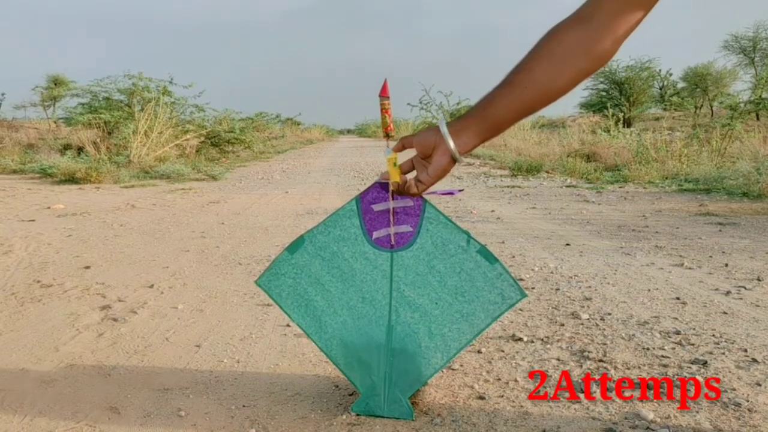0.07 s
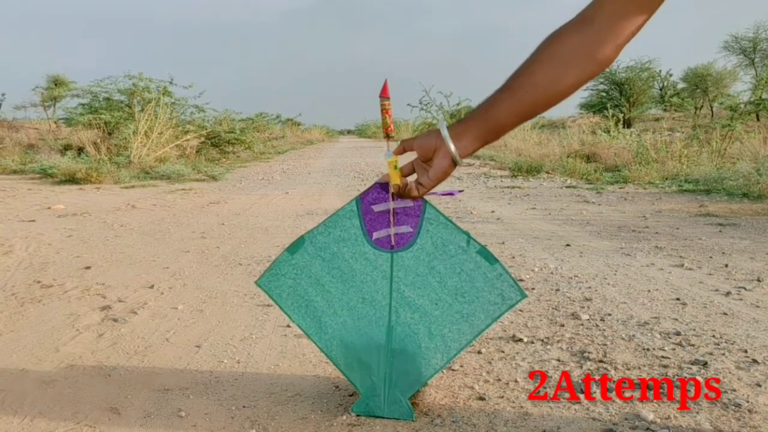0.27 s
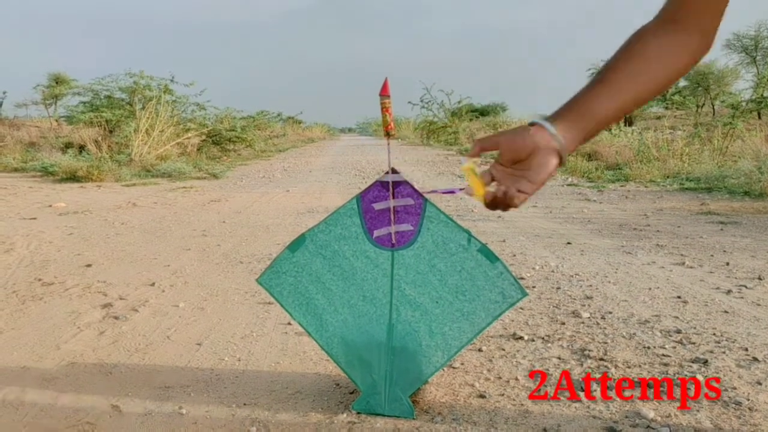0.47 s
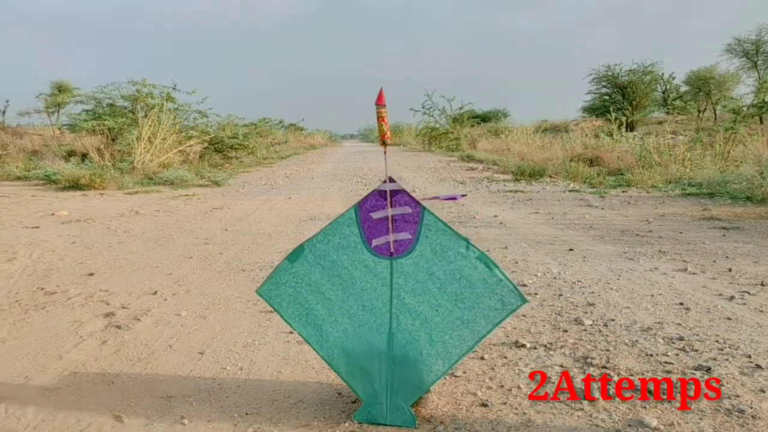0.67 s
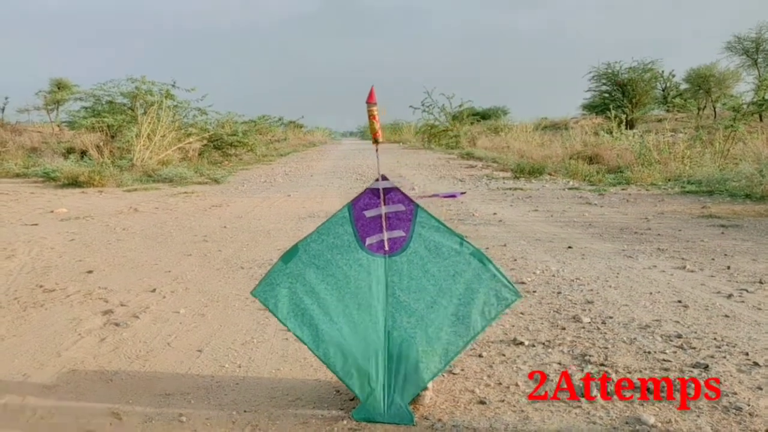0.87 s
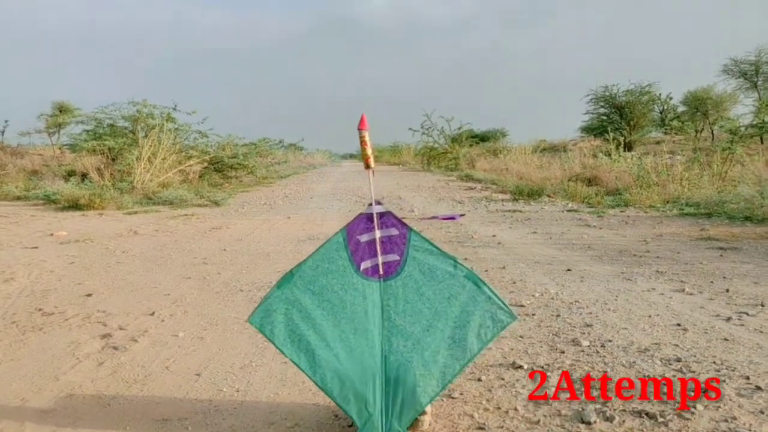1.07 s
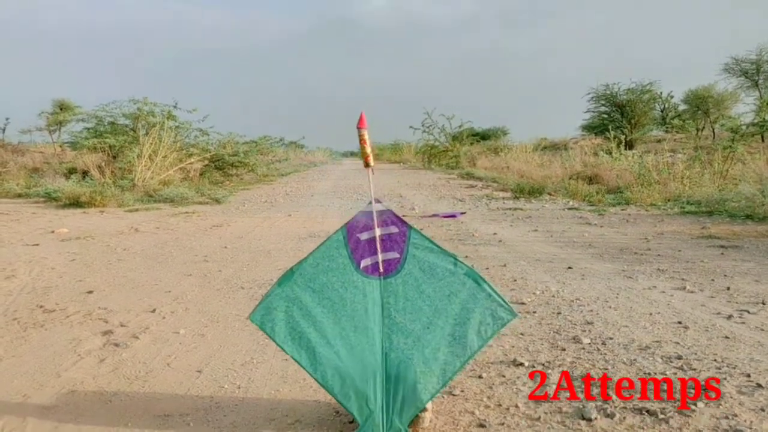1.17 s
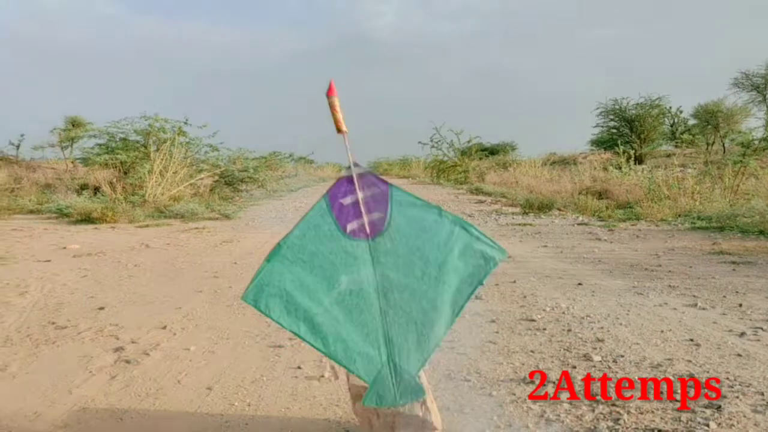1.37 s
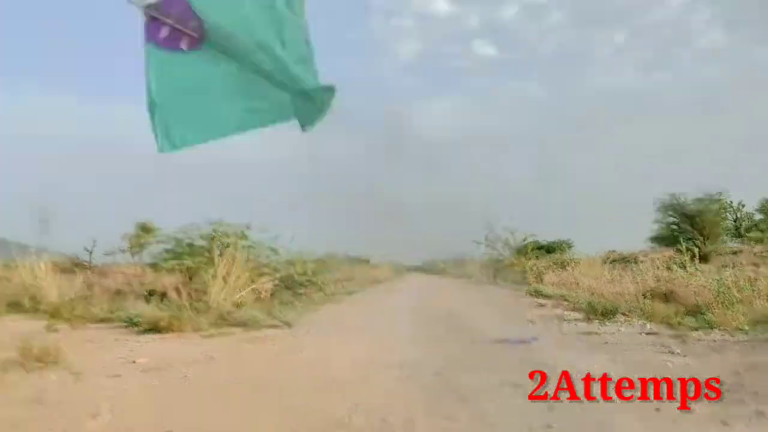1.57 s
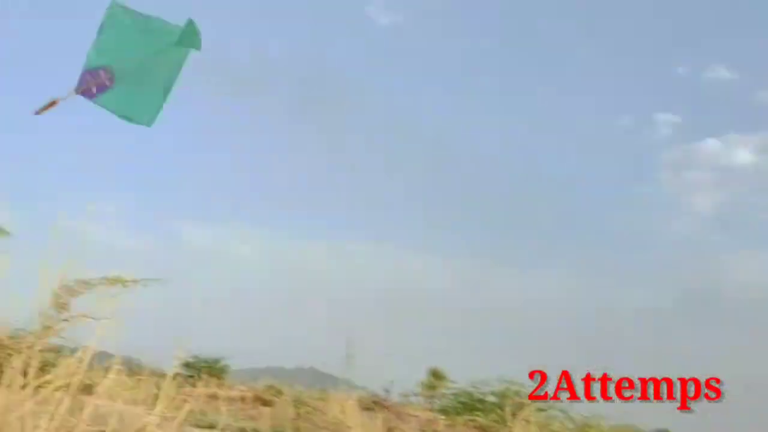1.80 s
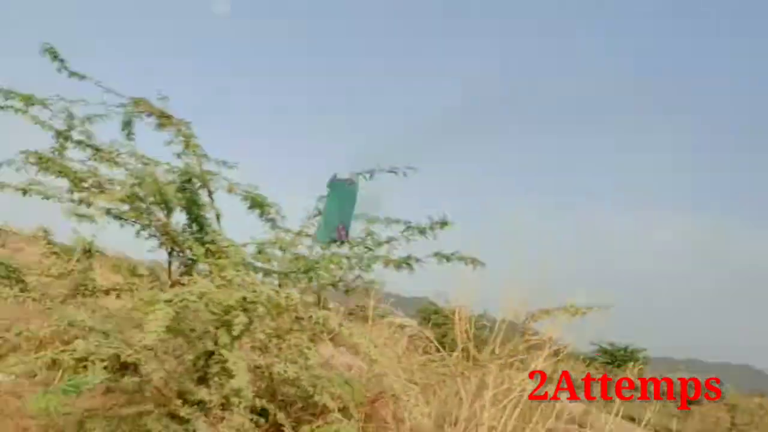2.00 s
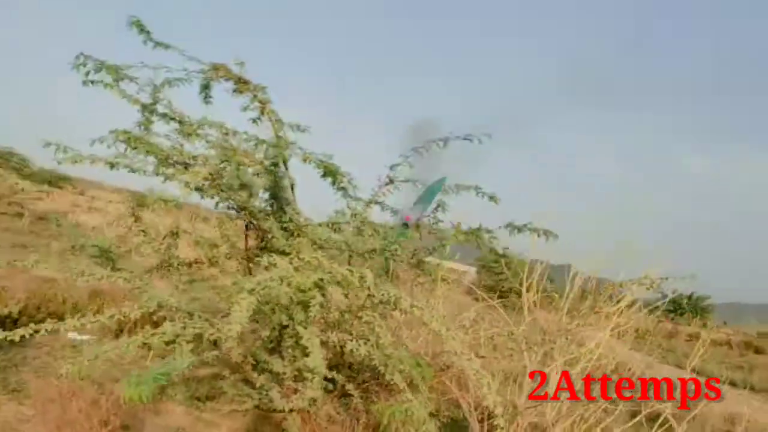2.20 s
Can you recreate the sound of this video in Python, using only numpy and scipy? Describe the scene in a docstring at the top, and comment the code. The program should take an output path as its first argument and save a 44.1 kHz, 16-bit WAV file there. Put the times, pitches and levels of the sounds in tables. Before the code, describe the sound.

Close to the microphone outdoors, small clicks and scuffs lead into a sputtering fuse; a rocket pops alight, blasts past with gritty roar and low buffeting, then recedes as a sweeping, duller hiss.

```python
"""Dirt track: a firework rocket tied to a paper kite is lit close to a handheld microphone.
Lighter clicks are short rings with noise snaps; the fuse sputters as grainy, fluttering noise.
The charge catches with a crack, a gas burst and ringing modes; the motor's noise roars, then hisses away.
The ground mirrors the jet through a moving delay, so its colour sweeps as it climbs.
Exhaust and breeze buffet the microphone in low noise; behind lie scuffs, birds, a dying hum and open air."""
import sys
import numpy as np
from scipy import signal
from scipy.fft import rfft, irfft
from scipy.io import wavfile
from scipy.ndimage import uniform_filter1d, map_coordinates

SR = 44100
rng = np.random.default_rng(int(sys.argv[2]) if len(sys.argv) > 2 else 0)


def transcribe(u):
    """Save the signal u as a 16-bit wav file named by the first command-line argument.

    u: samples, shape (n,) or (channels, n), limited to [-1, 1]; the rate is SR.
    q: integer samples, one column per channel.
    """
    v = np.clip(np.atleast_2d(u).T, -1, 1)
    q = np.round(v * 32767).astype(np.int16)
    wavfile.write(sys.argv[1], SR, q)


N = 99004
T = np.arange(N) / SR  # time [s]
F = np.arange(N // 2 + 1) * SR / N  # spectrum bins [Hz]

# motor at the microphone: (time [s], level [dB])
MOTOR_LEVEL_DB = [(1.374, -14.5), (1.428, -10), (1.486, -13), (1.505, -10.5), (1.59, -15.5), (1.62, -19.5),
                  (1.79, -21.5), (1.85, -20), (1.98, -21), (2.06, -24), (2.14, -20.5), (2.24, -28.5)]
# near roar and far motor, colours: (frequency [Hz], left [dB], right [dB])
NEAR_COLOUR_DB = [(100, -38, -29), (396, -4.5, -6), (990, -5.5, -9), (1630, -3.5, -3.5), (2200, -4, -0.5),
                  (2760, -19.5, -7), (3670, -0.5, -7.5), (4500, -2.5, -3), (6100, -3, -5.5),
                  (7200, -11.5, -12), (8400, -8, -5), (10040, -11, -6.5), (11460, -20, -16),
                  (13100, -16.5, -29), (15200, -18, -16)]
FAR_COLOUR_DB = [(100, -31, -26), (387, -12.5, -13), (880, -6.5, -8), (1700, -5.5, -8.5), (2480, -13.5, -1),
                 (3305, -3, -7.5), (4500, -1.5, -8), (5360, -14, -9), (7300, -13, -13.5),
                 (8300, -14, -12.5), (10400, -26, -14.5), (11100, -27, -21.5), (13000, -25, -34),
                 (15000, -24.5, -37)]
# swells of the nozzle's hiss band: (time [s], length [s], level [dB])
HISS_SWELLS_DB = [(1.34, 0.057, -36.5), (1.86, 0.07, -33), (2.07, 0.062, -26)]
# nozzle hiss colour: (frequency [Hz], left [dB], right [dB])
HISS_COLOUR_DB = [(2500, -45, -44), (3730, -4, -20), (4350, 0, -1), (5000, -12, -12), (6000, -36, -36)]
# lag of the ground reflection: (time [s], lag [ms])
GROUND_LAG_MS = [(1.3, 1.02), (1.4, 1.3), (1.5, 1.75), (1.6, 2.25), (1.72, 2.62), (1.85, 2.4), (1.96, 2.1),
                 (2.1, 2.5), (2.24, 2.85)]
# bearing, as the lag of the left port: (time [s], lag [ms])
PORT_LAG_MS = [(1.35, .04), (1.5, .1), (1.66, .23), (1.85, .17), (2, .08), (2.12, -.02)]
# ignition crack colour, also of the click snaps: (frequency [Hz], level [dB])
CRACK_COLOUR_DB = [(300, -19), (1700, 0), (2800, -12), (4200, 0.5), (6000, -9), (10000, -9), (12000, -35),
                   (15000, -29)]
# ignition gas burst colour: (frequency [Hz], level [dB])
BURST_COLOUR_DB = [(60, -18), (210, -3), (420, -9), (620, 4.5), (950, -1), (1200, -9), (1400, -3),
                   (1720, 0), (2100, -12), (3700, -13), (8000, -28.5)]
# tube and kite modes rung by the pop: (frequency [Hz], level [dB], decay [s])
POP_MODES_HZ_DB_S = [(209, -16, .011), (333, -21, 0.0087), (593, -17, .007), (1737, -12, 0.005),
                     (3710, -14, 0.0056)]
# burning fuse: (time [s], level [dB])
FUSE_LEVEL_DB = [(.19, -78), (.24, -61), (.34, -52.5), (.43, -56.5), (.54, -58.5), (.68, -56.5), (.77, -54),
                 (.87, -56.5), (.938, -56.5), (.946, -48.5), (.975, -40), (1.01, -45), (1.06, -31),
                 (1.115, -32), (1.17, -41), (1.245, -37), (1.29, -36.5), (1.35, -57)]
# fuse colour: (frequency [Hz], left [dB], right [dB])
FUSE_COLOUR_DB = [(100, -32, -23), (496, -9, -9.5), (920, -5, -6.5), (1380, -5, -4.5), (2120, -2.5, -1),
                  (2700, -14.5, -6), (3300, -7.5, -17), (4420, -1.5, 0.5), (5280, -9.5, -10.5),
                  (7060, -19.5, -18), (8300, -13, -7.5), (10400, -22.5, -16.5), (11800, -23, -29),
                  (15100, -25, -27)]
# exhaust blasts on the microphone: (time [s], length [s], level [dB])
BLAST_SWELLS_DB = [(1.424, 0.0062, -13.5), (1.454, 0.0095, -18.5), (1.498, .003, -22), (1.511, .005, -15.5),
                   (1.845, .012, -30), (1.93, .008, -29)]
# exhaust blast colour: (frequency [Hz], level [dB])
BLAST_COLOUR_DB = [(30, -20.5), (85, -2), (170, 5), (260, -1), (400, -7.5), (700, -6.5), (1500, -17.5),
                   (5000, -47)]
# gusts of breeze on the microphone: (time [s], length [s], level [dB])
GUST_SWELLS_DB = [(.178, 0.015, -39.5), (.28, 0.053, -43), (.765, 0.032, -38), (.84, 0.021, -46),
                  (1.0, 0.029, -51.5), (1.2, 0.041, -45.5), (1.69, 0.029, -31), (1.89, 0.041, -33)]
# low turbulence colour, breeze and jet rumble: (frequency [Hz], level [dB])
WIND_COLOUR_DB = [(25, -44), (55, -43), (80, -5.5), (112, -2), (160, -7), (260, -13), (500, -33),
                  (2000, -58)]
# lighter clicks and fuse spits: (time [s], level [dB], ring [Hz], snap against ring [dB])
CLICKS_S_DB_HZ_DB = [(.3375, -39.5, 2120, -5), (0.3757, -31, 2000, -16), (0.3836, -34, 2300, -7),
                     (0.3865, -34, 1950, -0.5), (0.3938, -31.5, 2030, -20), (0.783, -59, 2300, -2),
                     (0.84, -46, 1610, -6), (.8578, -44.5, 4490, -3), (0.8797, -45, 2040, 3),
                     (.9445, -50, 1980, 1)]
# scuffs of hands and feet: (time [s], length [s], level [dB])
SCUFF_SWELLS_DB = [(.29, 0.049, -56), (.365, 0.032, -52), (.53, 0.053, -66), (.776, 0.008, -44),
                   (.835, 0.022, -54)]
# scuff colour: (frequency [Hz], level [dB])
SCUFF_COLOUR_DB = [(150, -11), (600, -0.5), (1100, -0.5), (1450, -2.5), (2200, 0.5), (3200, -14.5),
                   (5000, -15), (10000, -27), (15000, -40)]
# chirp of a small bird: (time [s], pitch [Hz], level [dB])
CHIRP_HZ_DB = [(0, 2880, -73), (.011, 3500, -65), (.027, 3010, -66), (.036, 2700, -65), (.053, 2690, -72),
               (.062, 3310, -60), (.07, 3700, -63), (.079, 2950, -65)]
# faint rising whistle of a farther bird: (time [s], pitch [Hz], level [dB])
WHISTLE_HZ_DB = [(.155, 1340, -84), (.185, 1415, -73), (.23, 1540, -71), (.27, 1600, -80)]
# partials of a faint far-off hum: (frequency [Hz], starting level [dB])
HUM_HZ_DB = [(388, -54.5), (700, -70), (786, -72), (1308, -73)]
# open air colour: (frequency [Hz], level [dB])
AIR_COLOUR_DB = [(25, -31), (60, -17), (115, 2.5), (250, -9), (380, -9), (520, -23), (720, -20),
                 (1000, -32), (3500, -35), (15000, -53)]

CATCH_S, CATCH_DB = 1.285, -13.5  # weak first burn, against full thrust
MOTOR_START_S, MOTOR_ATTACK_S = 1.3695, 0.0016
AWAY_FROM_S, AWAY_TO_S = 1.42, 1.85  # near roar turns into far hiss
RUMBLE_DB = -20  # against the roar
DULL_FROM_S, DULL_TO_S, DULL_HZ = 2.13, 2.24, 6000
GROUND_SHARE, GROUND_TOP_HZ = 0.47, 9000
PORT_ECHO_MS, PORT_ECHO_HZ = 0.299, 2570
CRACK_S, CRACK_DB, CRACK_ATTACK_S, CRACK_DECAY_S = 1.269, -8, 0.0066, 0.0067
BURST_S, BURST_DB, BURST_ATTACK_S, BURST_DECAY_S = 1.2735, -4.5, 0.003, 0.0045
CLICK_RING_ATTACK_S, CLICK_RING_DECAY_S = 0.00063, 0.0014
SNAP_ATTACK_S, SNAP_DECAY_S = 0.0004, 0.0027
HUM_DECAY_S, AIR_DB = 0.16, -55.5
LOW_CUT_HZ, TOP_HZ = 29, 15600


def motor():
    """The jet catches weakly, jumps to full thrust and narrows from roar to hiss as it flies off."""
    jet = burn(sparks_per_s=900, spark_db=-9.5, flutter_db=0.8, flutter_rate_hz=70, shared=0.36)
    away = np.clip((T - AWAY_FROM_S) / (AWAY_TO_S - AWAY_FROM_S), 0, 1)
    full_thrust = np.clip((T - MOTOR_START_S) / MOTOR_ATTACK_S, 0, 1)
    weak_thrust = amp(CATCH_DB) * (T > CATCH_S)
    thrust = np.maximum(full_thrust, weak_thrust)
    roar = (1 - away) * colour(jet, NEAR_COLOUR_DB) + away * colour(jet, FAR_COLOUR_DB)
    rumble = amp(RUMBLE_DB) * colour(pair(0.018), WIND_COLOUR_DB)
    hiss = colour(jet, HISS_COLOUR_DB) * swells(HISS_SWELLS_DB)
    return (roar + rumble) * thrust * amp(curve(MOTOR_LEVEL_DB)) + hiss


def turn_away(x):
    """The treble fades as the nozzle turns away: cross-fade to a low-passed copy."""
    dull = irfft(rfft(x) / np.sqrt(1 + (F / DULL_HZ) ** 2), N)
    share = np.clip((T - DULL_FROM_S) / (DULL_TO_S - DULL_FROM_S), 0, 1)
    return x + (dull - x) * share


def burn(sparks_per_s, spark_db, flutter_db, flutter_rate_hz, shared):
    """Fluttering gas noise with bursting grains, heard directly and via the ground."""
    grains = (rng.random(N) < sparks_per_s / SR) * rng.laplace(size=N)
    grainy = pair(shared) + amp(spark_db) * grains / grains.std()
    gas = grainy * amp(flutter_db * walk(flutter_rate_hz))
    ground_filter = signal.butter(1, GROUND_TOP_HZ, fs=SR, output="sos")
    mirrored = signal.sosfilt(ground_filter, gas)
    reflection = np.array([late(m, curve(GROUND_LAG_MS)) for m in mirrored])
    left, right = gas + GROUND_SHARE * reflection
    # the casing turns the phase of the right port's treble
    echo = F / PORT_ECHO_HZ * np.exp(-2j * np.pi * F * PORT_ECHO_MS / 1000)
    right_turned = irfft(rfft(right) * np.exp(1j * np.angle(1 - echo)), N)
    ports = np.array([late(left, curve(PORT_LAG_MS)), right_turned])
    ports = flicker(ports, spread_db=1.32, rate_hz=45)
    return ports / ports.std()


def flicker(x, spread_db, rate_hz):
    """Turbulence: half-octave bands from 250 Hz up waver each on their own."""
    place = np.clip(2 * np.log2(np.maximum(F, 1) / 250), 0, 12)
    spectrum, out = rfft(x), 0
    for k in range(13):
        band = irfft(spectrum * np.maximum(1 - abs(place - k), 0), N)
        out = out + band * amp(spread_db * walk(rate_hz))
    return out


def ignition():
    """The charge catches with a crack and a short burst of gas that rings tube and kite."""
    crack = colour(pair(0.24), CRACK_COLOUR_DB) * strike(CRACK_S, CRACK_ATTACK_S, CRACK_DECAY_S)
    burst = colour(pair(0.79), BURST_COLOUR_DB) * strike(BURST_S, BURST_ATTACK_S, BURST_DECAY_S)
    ring = 0
    for hz, db, decay_s in POP_MODES_HZ_DB_S:
        tone = np.sin(2 * np.pi * hz * (T - BURST_S))
        ring = ring + amp(db) * tone * strike(BURST_S, BURST_ATTACK_S, decay_s)
    return amp(CRACK_DB) * crack + amp(BURST_DB) * burst + ring


def fuse():
    """The fuse fizzes in spurts and flares as it reaches the nozzle."""
    fizz = burn(sparks_per_s=820, spark_db=-11.5, flutter_db=1.3, flutter_rate_hz=70, shared=0.36)
    return colour(fizz, FUSE_COLOUR_DB) * amp(curve(FUSE_LEVEL_DB))


def buffeting():
    """Exhaust and breeze rumble on the microphone ports."""
    exhaust = colour(pair(0.13), BLAST_COLOUR_DB) * swells(BLAST_SWELLS_DB)
    breeze = colour(pair(0.067), WIND_COLOUR_DB) * swells(GUST_SWELLS_DB)
    return exhaust + breeze


def clicks():
    """Each lighter click or fuse spit is a brief ring with a snap of noise."""
    noise, out = colour(pair(0.23), CRACK_COLOUR_DB), 0
    for start_s, db, hz, snap_db in CLICKS_S_DB_HZ_DB:
        tone = np.sin(2 * np.pi * hz * (T - start_s))
        ring = np.sqrt(2) * tone * strike(start_s, CLICK_RING_ATTACK_S, CLICK_RING_DECAY_S)
        snap = amp(snap_db) * noise * strike(start_s, SNAP_ATTACK_S, SNAP_DECAY_S)
        out = out + amp(db) * (ring + snap)
    return out


def scuffs():
    """Gritty rubbing of hands and feet: noise under a fast random level."""
    grit = pair(0.42) * amp(4.1 * walk(250))
    return colour(grit, SCUFF_COLOUR_DB) * swells(SCUFF_SWELLS_DB)


def bird(rows):
    """A gliding note that wavers in the open air."""
    sounding = (T >= rows[0][0]) & (T < rows[-1][0])
    hz = curve(rows) * (1 + 0.012 * walk(400))
    level_db = curve(rows, axis=2) + 2.5 * walk(180)
    return np.sin(2 * np.pi * np.cumsum(hz) / SR) * amp(level_db) * sounding


def hum():
    """Far-off partials share one unsteady clock and die away."""
    clock_s = np.cumsum(1 + 0.0193 * walk(29.7)) / SR
    partials = sum(amp(db) * np.sin(2 * np.pi * hz * clock_s) for hz, db in HUM_HZ_DB)
    return partials * np.exp(-T / HUM_DECAY_S)


def countryside():
    """Quiet open air, as wavering noise, with two bird notes and the hum."""
    tones = np.sqrt(2) * (bird(CHIRP_HZ_DB) + bird(WHISTLE_HZ_DB) + hum())
    air = colour(pair(0.62), AIR_COLOUR_DB) * amp(AIR_DB + 1.04 * walk(8.1))
    return tones + air


def amp(db):
    """Decibels to gain."""
    return 10 ** (np.asarray(db) / 20)


def curve(rows, axis=1):
    """One column of a table, joined by straight lines in time."""
    rows = np.array(rows)
    return np.interp(T, rows[:, 0], rows[:, axis])


def colour(x, rows):
    """Shape white sound by mono or left/right spectrum points, keeping its power."""
    rows = np.array(rows, float)
    log_f = np.log(np.maximum(F, 1))
    gain = amp([np.interp(log_f, np.log(rows[:, 0]), col) for col in rows.T[1:]])
    return irfft(rfft(x) * gain / np.sqrt(np.mean(gain ** 2)), N)


def walk(rate_hz):
    """Smooth random wander with a spread near 1."""
    k = max(int(SR / rate_hz), 2)
    steps = np.repeat(rng.standard_normal(N // 20), k)[:N]
    return np.sqrt(2) * uniform_filter1d(steps, k)


def pair(shared):
    """White noise at two ports; shared is the power fraction common to both."""
    common, *own = rng.standard_normal((3, N))
    return np.sqrt(shared) * common + np.sqrt(1 - shared) * np.array(own)


def late(x, lag_ms):
    """Read a sound through a moving delay."""
    return map_coordinates(x, [np.arange(N) - lag_ms * SR / 1000], mode="mirror")


def strike(start_s, attack_s, decay_s):
    """Straight rise, exponential fall."""
    rise = np.clip((T - start_s) / attack_s, 0, 1)
    return rise * np.exp(-np.maximum(T - start_s - attack_s, 0) / decay_s)


def swells(rows):
    """Bell-shaped swells, summed in power; length is the bell's standard deviation."""
    power = 0
    for centre_s, length_s, db in rows:
        bell = np.exp(-0.5 * ((T - centre_s) / length_s) ** 2)
        power = power + (amp(db) * bell) ** 2
    return np.sqrt(power)


def scene():
    """Everything at the two ports."""
    rocket = turn_away(motor()) + ignition() + fuse()
    return rocket + buffeting() + clicks() + scuffs() + countryside()


def record(dry):
    """The recorder thins the deep bass, clips at full scale and cuts the top."""
    bass_cut = signal.butter(1, LOW_CUT_HZ, "high", fs=SR, output="sos")
    top_cut = signal.ellip(10, 0.2, 70, TOP_HZ, fs=SR, output="sos")
    thin = signal.sosfilt(bass_cut, dry)
    return signal.sosfilt(top_cut, np.clip(thin, -1, 1))


dry = scene()
out = record(dry)
transcribe(out)
```